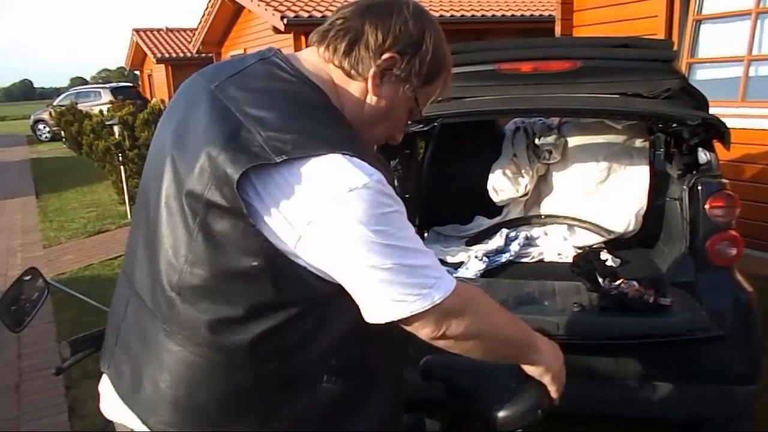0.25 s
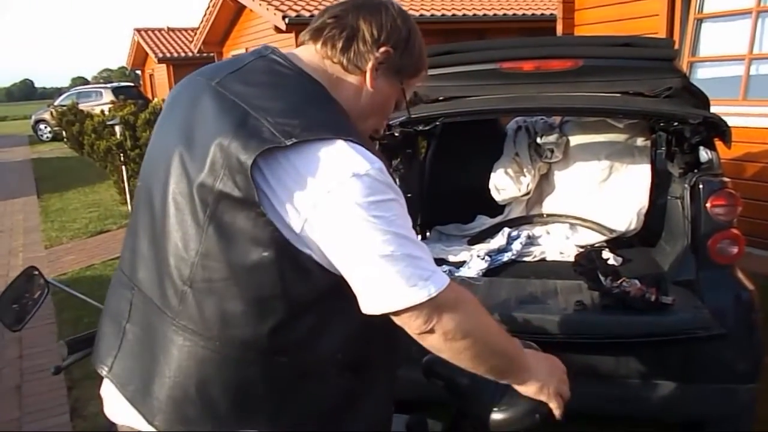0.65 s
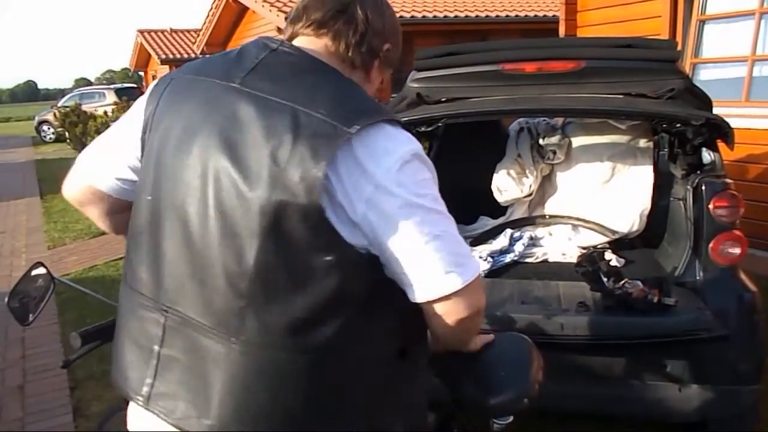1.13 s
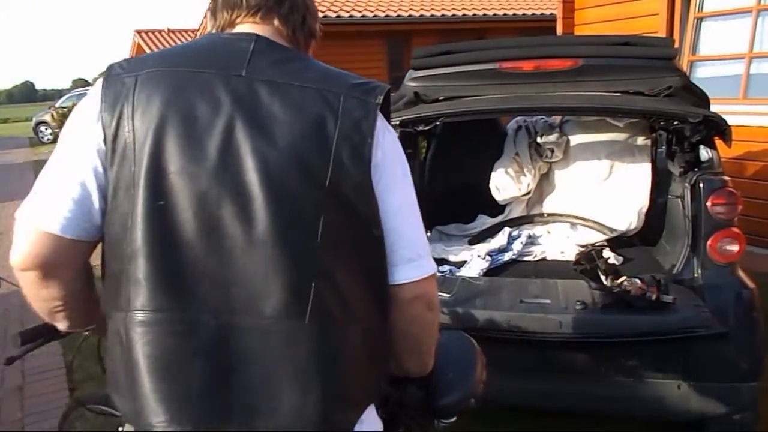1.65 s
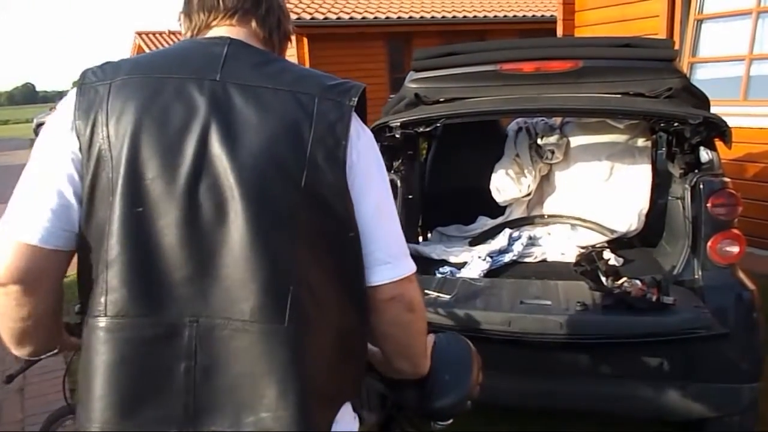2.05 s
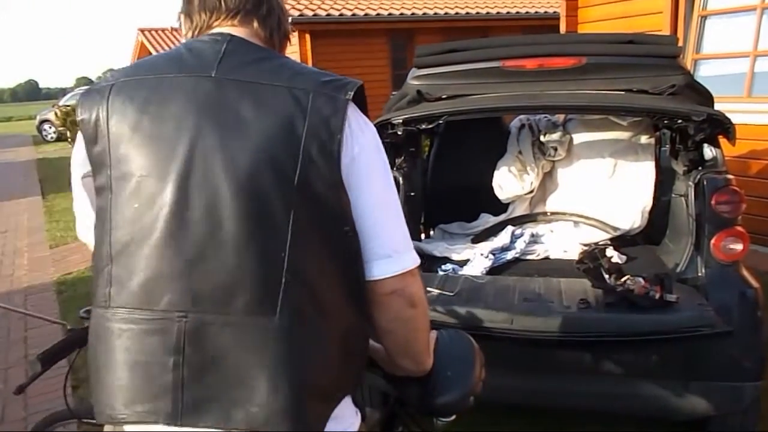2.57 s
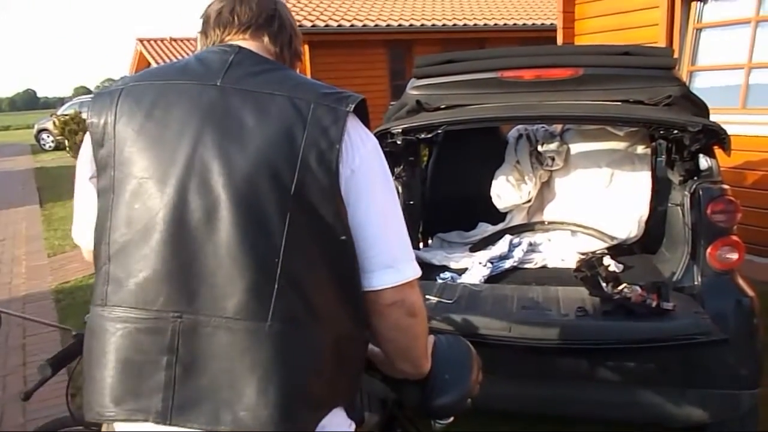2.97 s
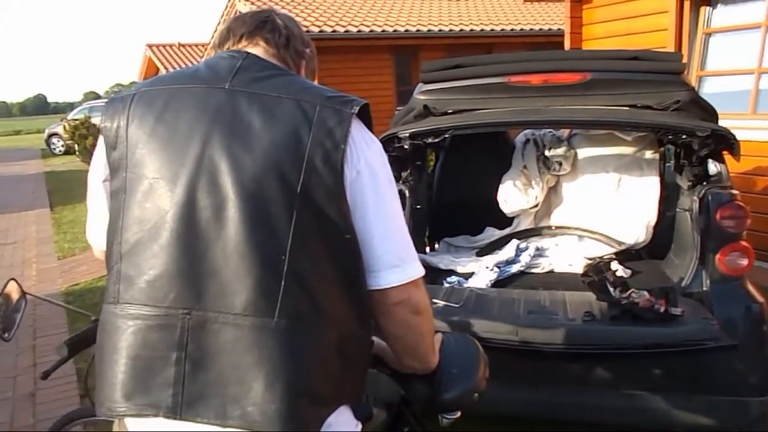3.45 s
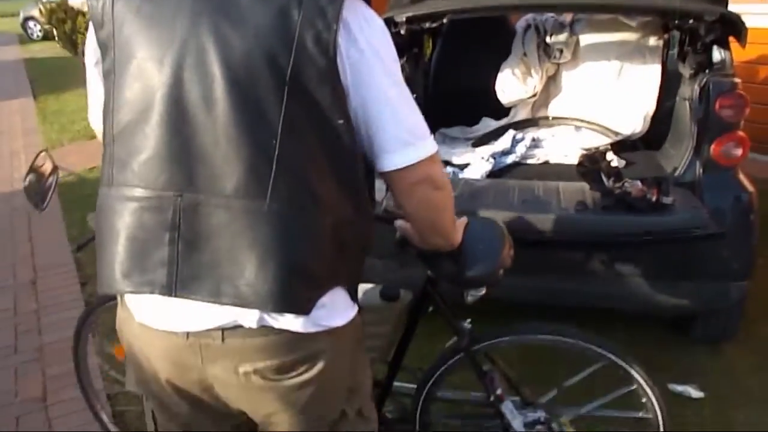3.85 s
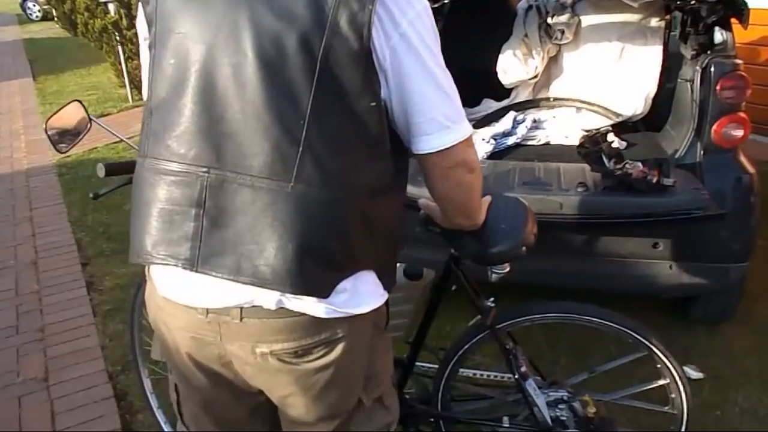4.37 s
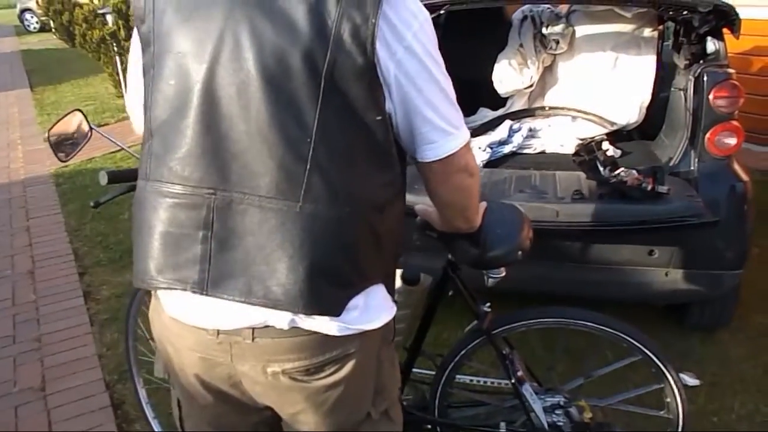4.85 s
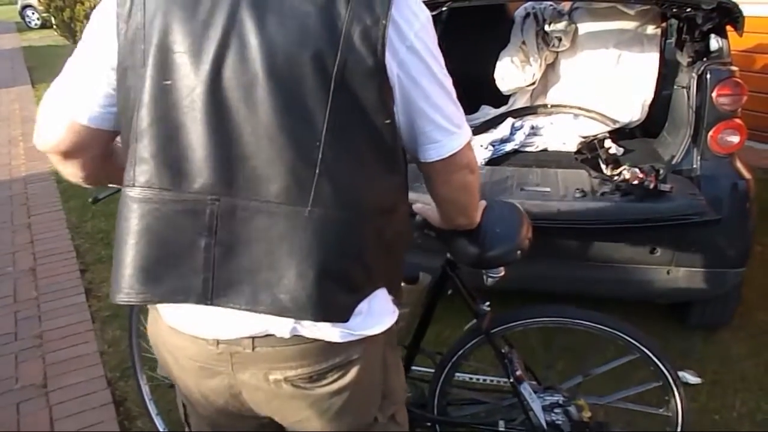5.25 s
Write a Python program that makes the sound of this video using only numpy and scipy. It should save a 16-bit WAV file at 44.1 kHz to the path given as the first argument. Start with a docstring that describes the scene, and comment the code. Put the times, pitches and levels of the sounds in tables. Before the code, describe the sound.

A small two-stroke bicycle motor putters unevenly, then idles with crackling pops until it is cut, coasts down and clanks to rest.

```python
"""A small two-stroke motor on a bicycle idles almost straight ahead of the microphone, in a driveway by a parked car.
It fires on every second turn, now and then on every third: each firing cracks, spits gas and booms in the pipe.
The ignition is cut with a snap of a lever, the crank coasts down, the drive rasps and clanks to rest.
Dull knocks fall at the start, around the cut and at the end, where the moved bicycle also creaks and rubs.
Behind it lie still outdoor air, a faint breeze on the microphone ports and short echoes of the driveway."""
import sys
import numpy as np
from scipy import signal
from scipy.fft import rfft, irfft
from scipy.io import wavfile

SR = 44100
rng = np.random.default_rng(int(sys.argv[2]) if len(sys.argv) > 2 else 0)


def file_out(sig):
    """Save sig as 16-bit WAV at sys.argv[1]."""
    # one column per channel
    cols = np.atleast_2d(sig).T
    # limit, then scale
    lim = np.clip(cols, -1, 1)
    pcm = np.round(lim * 32767).astype(np.int16)
    wavfile.write(sys.argv[1], SR, pcm)


N = 242980
TIME = np.arange(N) / SR


def from_db(db):
    """Decibels to gain."""
    return 10 ** (np.asarray(db) / 20)


def rms_one(x):
    """Scale to rms 1."""
    return x / np.sqrt(np.mean(x ** 2) + 1e-20)


def clicks(times, sizes, spread_db=0):
    """One click at each time, its size varied by chance."""
    out = np.zeros(N)
    at = np.round(np.asarray(times) * SR).astype(int)
    sizes = sizes * from_db(spread_db * rng.standard_normal(len(at)))
    inside = (at >= 0) & (at < N)
    np.add.at(out, at[inside], sizes[inside])
    return out + 1e-18


def grains(per_s):
    """Sparse clicks of random time, size and sign."""
    return (rng.random(N) < per_s / SR) * rng.standard_normal(N)


def resonate(x, hz, width):
    """A resonance of gain 1 at its top."""
    r = np.exp(-np.pi * width / SR)
    top = np.array([1, 0, -1]) * (1 - r * r) / 2
    return signal.lfilter(top, [1, -2 * r * np.cos(2 * np.pi * hz / SR), r * r], x)


def resonances(x, rows):
    """Resonances side by side; a fourth column, if any, is a signed factor."""
    return sum(np.prod(factor) * from_db(db) * resonate(x, hz, width) for hz, width, db, *factor in rows)


def struck(x, hz, width):
    """A unit click sets a sine of height 1 ringing."""
    r, w = np.exp(-np.pi * width / SR), 2 * np.pi * hz / SR
    return signal.lfilter([0, np.sin(w)], [1, -2 * r * np.cos(w), r * r], x)


def pops(times, sizes, hz, width, wander, spread_db, size=1024):
    """Each click rings a double resonance briefly, at a pitch and strength of its own."""
    out, unit = np.zeros(N + size), signal.unit_impulse(size)
    starts = np.round(times * SR).astype(int)
    sizes = sizes * np.ones(len(times))
    chances = rng.standard_normal((len(times), 2))
    for i, gain, (pitch, strength) in zip(starts, sizes, chances):
        centre = min(hz * np.exp(wander * pitch), .45 * SR)
        if 0 <= i < N:
            ring = resonate(resonate(unit, centre, width), centre, 1.07 * width)
            out[i:i + size] += gain * from_db(spread_db * strength) * ring
    return out[:N]


def blip(hz, rise_s, size=4096):
    """A short tone that swells for rise_s, to an envelope of 1, and dies away."""
    t = TIME[:size]
    return t / rise_s * np.exp(1 - t / rise_s) * np.sin(2 * np.pi * hz * t)


def fade(x, seconds):
    """Each click becomes a falling exponential of the same height."""
    return signal.lfilter([1], [1, -np.exp(-1 / (seconds * SR))], x)


def swells(rows):
    """Gain per sample of sounds that rise and fall smoothly."""
    return sum(from_db(db) * np.exp(-((TIME - s) / half) ** 2) for s, half, db in rows)


def waver(per_s):
    """A random curve of spread about 1 that takes a new value per_s times a second."""
    return np.interp(TIME * per_s, np.arange(2000), rng.standard_normal(2000))


def response(spectrum, size=2048):
    """The causal impulse response that has this spectrum, by folding the cepstrum."""
    hz, db = np.transpose(spectrum)
    grid = np.maximum(np.arange(size + 1) * SR / (2 * size), 1)
    cepstrum = irfft(np.log(from_db(np.interp(np.log(grid), np.log(hz), db))))
    cepstrum[1:size] *= 2
    cepstrum[size + 1:] = 0
    return irfft(np.exp(rfft(cepstrum)))


def through(x, impulse):
    """Pass a sound through an impulse response."""
    return signal.oaconvolve(x, impulse)[:N]


def noise(spectrum):
    """Coloured noise of rms 1."""
    return rms_one(through(rng.standard_normal(N), response(spectrum)))


def no_bass(x):
    """Small jets and small parts radiate no bass."""
    return signal.sosfilt(signal.butter(4, 520, "high", fs=SR, output="sos"), x)


# runs of even firing with a stumble between: first firing t/s, last firing t/s, firings, lag at mid-run/s
RUNS = [(-.005, .0383, 2, 0), (.1055, .1507, 2, 0), (.2202, .4842, 7, .0008), (.533, .7955, 7, .0014),
        (.864, 1.6937, 20, .0006), (1.7618, 2.0675, 8, .0005), (2.1353, 3.089, 23, .0039),
        (3.1335, 3.563, 11, -.001)]
# the ignition is cut after the last firing; oil drag and dry friction then slow the crank
CUT_S = RUNS[-1][1]
IDLE_TURNS_PER_S, DRAG_S, FRICTION_TURNS_PER_S2 = 45.21, 1.562, 31.03


def crank_speed():
    """Share of the idling speed: 1 until the cut, then falling to rest."""
    friction = FRICTION_TURNS_PER_S2 * DRAG_S / IDLE_TURNS_PER_S
    slowing = np.exp(-np.maximum(TIME - CUT_S, 0) / DRAG_S)
    return np.maximum((1 + friction) * slowing - friction, 0)


def crank():
    """Times of all turns and which fire: timed firings, idle turns between, then the coasting turns."""
    firings = []
    for first, last, count, lag in RUNS:
        u = np.linspace(0, 1, count)
        firings.extend(first + (last - first) * u + lag * np.sin(np.pi * u))
    # each gap starts with its firing and goes on with the idle turns
    idling = [np.linspace(a, b, round((b - a) * IDLE_TURNS_PER_S), endpoint=False)
              for a, b in zip(firings, firings[1:])]
    coasted = np.cumsum(crank_speed() * (TIME > CUT_S)) * IDLE_TURNS_PER_S / SR
    coasting_turns = TIME[np.searchsorted(coasted, np.arange(1, coasted[-1]))]
    turns = np.concatenate(idling + [firings[-1:], coasting_turns])
    return turns, np.isin(turns, firings)


def crank_angle(turns):
    """Angle of the crank in radians, one full circle from each turn to the next."""
    return 2 * np.pi * np.interp(TIME, turns, np.arange(len(turns)))


# still outdoor air: f/Hz, level/dB per Hz
AIR_SPECTRUM = [(20, -34), (60, -8), (110, -7.5), (190, -3.5), (262, 3), (380, -2), (550, -8),
                (1100, -12.5), (1900, -11.5), (2900, -16), (5000, -21.5), (7000, -35), (15000, -23)]
AIR_DB, WASH_DB, WASH_SPEED_POWER = -51.5, -40, 0.91


def air_level(speed):
    """Gain of the still outdoor air and of the soft wash of noise that the turning motor adds to it."""
    return np.hypot(from_db(AIR_DB), from_db(WASH_DB) * speed ** WASH_SPEED_POWER)


# faint breeze at the microphone: f/Hz, level/dB per Hz
BREEZE_SPECTRUM = [(25, 13), (70, 5.5), (150, -15), (300, -19), (1000, -59)]


def breeze(level_db=-78):
    """Air moving over the microphone ports is heard as a faint low noise."""
    return from_db(level_db) * noise(BREEZE_SPECTRUM)


def driveway(x, echo_db=-11, decay_s=0.033, low_hz=700, size=8192):
    """Scattered short echoes from the car, the paving and the house wall."""
    t = TIME[:size]
    echoes = rng.standard_normal(size) * (rng.random(size) < 1500 / SR) * (t > .003) * np.exp(-t / decay_s)
    bright = signal.sosfilt(signal.butter(2, low_hz, "high", fs=SR, output="sos"), x)
    return x + from_db(echo_db) * through(bright, echoes / np.sqrt(np.sum(echoes ** 2)))


# saddle creaks: middle t/s, half length to 1/e /s, level/dB
CREAKS = [(4.86, 0.05, -54), (5.04, 0.087, -56), (5.41, 0.29, -55.5)]
# tyre rubbing softly: middle t/s, half length to 1/e /s, level/dB
SCRAPES = [(4.41, 0.081, -55), (4.83, 0.079, -50.5), (4.99, 0.07, -58)]
# clothing: middle t/s, half length to 1/e /s, level/dB
RUSTLES = [(5.2, 0.37, -62), (5.47, 0.1, -52.5)]
# resonances of the rubbing: f/Hz, half the width of each of two passes/Hz, level/dB
RUB = [(1310, 130, -4), (1860, 180, -2), (2050, 86, -1)]
# colour of the saddle, also of parts settling after a knock: f/Hz, level/dB per Hz
SADDLE = [(150, -14), (500, -14), (1000, 6), (1400, 3), (2080, 4), (2330, -8), (2600, 2), (2900, -16),
          (6000, -31), (12000, -42)]
# colour of cloth: f/Hz, level/dB per Hz
CLOTH = [(150, -4), (500, -13), (1200, -5), (2000, -7), (3500, 0), (5500, -5.5), (8000, -7), (15000, -24)]


def handling(slips_per_s=900):
    """The saddle creaks under a hand and the tyre rubs, both by tiny slips; clothing rustles as noise."""
    slips = grains(slips_per_s)
    rubbing = sum(from_db(db) * resonate(resonate(slips, hz, 2 * width), hz, 2 * width)
                  for hz, width, db in RUB)
    creaking = swells(CREAKS) * rms_one(through(slips, response(SADDLE)))
    return creaking + swells(SCRAPES) * rms_one(rubbing) + swells(RUSTLES) * noise(CLOTH)


# low resonances of the frame: f/Hz, width/Hz, level/dB
FRAME = [(216, 77, 0), (279, 24, -0.5), (478, 49, -2), (530, 44, -17)]
# frame rumbles: middle t/s, half length to 1/e /s, level/dB
RUMBLES = [(.205, 0.017, -25.5), (3.53, 0.018, -30), (3.615, 0.023, -29), (3.85, 0.15, -41.5),
           (4.12, 0.14, -39.5), (4.42, 0.04, -46), (5.02, 0.033, -49.5)]


def rumble():
    """The frame's low resonances, driven by noise, rumble as the bicycle is jostled."""
    return swells(RUMBLES) * rms_one(resonances(rng.standard_normal(N), FRAME))


# dull knocks: t/s, thud level/dB, hollow f/Hz, clack level/dB, clack f/Hz
KNOCKS = [(.098, -12.5, 198, -19, 1390), (0.1, -34, 245, -21, 1330), (.189, -24, 227, -42, 1400),
          (.198, -21, 226, -15, 1960), (3.564, -23, 242, -26, 2450), (3.575, -31, 237, -17, 1890),
          (3.639, -32, 240, -19.5, 2060), (4.862, -27, 193, -40, 1850), (4.881, -23.5, 239, -25, 1990),
          (4.891, -32, 240, -28.5, 1380), (4.905, -33, 248, -35, 1480), (4.937, -22, 234, -37, 1880),
          (4.986, -42, 250, -44, 1950), (5.027, -37, 255, -43, 1400), (5.262, -40, 253, -36.5, 1910),
          (5.269, -43, 255, -42, 2410), (5.289, -47, 260, -50, 1700)]
# colour of a thud: f/Hz, level/dB per Hz
THUD = [(40, -29), (80, -4), (130, -0.5), (230, 16.5), (350, 5), (700, -3.5), (1600, -0.5), (3000, -56),
        (9000, -60)]


def knocks(clack_rise_s=0.0011, hollow_rise_s=0.0045, hollow_db=-9, tube_hz=590, tube_width=140, tube_db=4,
           crackle_s=0.0088, crackle_db=-17, crackles_per_s=900):
    """Soft knocks: a hollow thud and a clack at the pitch of the spot struck, then parts crackle and settle."""
    thud = response(THUD)
    s, thud_level = np.transpose(KNOCKS)[:2]
    blows = clicks(s, from_db(thud_level))
    thuds = through(blows, thud / np.abs(thud).max())
    out = thuds + from_db(tube_db) * resonate(thuds, tube_hz, tube_width)
    settling = rms_one(through(grains(crackles_per_s), response(SADDLE)))
    out += from_db(crackle_db) * fade(blows, crackle_s) * settling
    for start, thud_db, hollow_hz, clack_db, clack_hz in KNOCKS:
        hollow = from_db(thud_db + hollow_db) * blip(hollow_hz, hollow_rise_s)
        tones = hollow + from_db(clack_db) * blip(clack_hz, clack_rise_s)
        i = round(start * SR)
        out[i:i + len(tones)] += tones
    return out


# the lever's snap: f/Hz, width/Hz, level/dB
LEVER = [(620, 500, 14.5), (1860, 760, 22.5), (2480, 690, 18)]


def lever(snap_s=3.5651, count=4, bounce_s=.0017, loss_db=2.7):
    """A lever snaps over as the ignition is cut: it hits its stop and bounces, weaker each time."""
    k = np.arange(count)
    at = snap_s + bounce_s * k
    return sum(pops(at, from_db(db - loss_db * k), hz, width, wander=0.093, spread_db=0.0)
               for hz, width, db in LEVER)


# vibration locked to the crank: multiple of the turning rate, level/dB
SHAKE = [(3, -21), (4, -2.5), (5, -10), (6, -4.5), (7, -2.5), (8, -10), (13, -18), (14, -13)]


def coasting(turns, speed, shake_db=-27.0, onset_s=0.066, shake_speed_power=3.8, rough=0.26, rough_per_s=25):
    """Running down, the crank shakes the bicycle with a rough, falling hum."""
    shake = from_db(shake_db) * np.clip((TIME - CUT_S) / onset_s, 0, 1) * speed ** shake_speed_power
    angle = crank_angle(turns)
    hum = 0
    for multiple, db in SHAKE:
        height = from_db(db) * (1 + rough * waver(rough_per_s))
        phase = rough * waver(rough_per_s) + rng.uniform(0, 2 * np.pi)
        hum = hum + height * np.sin(round(multiple) * angle + phase)
    return shake * hum * (TIME < turns[-1])


def backlash(speed, ticks_per_s=260, tick_hz=2300, tick_width=520, wander=0.453, tick_db=2,
             tick_speed_power=1.4):
    """With no load the gears clatter loosely to and fro as the crank coasts, each tick at its own pitch."""
    hit = (rng.random(N) < ticks_per_s / SR) & (TIME > CUT_S) & (speed > 0)
    sizes = from_db(tick_db) * speed[hit] ** tick_speed_power
    return pops(TIME[hit], sizes, tick_hz, tick_width, wander, spread_db=2.0)


# slack of the drive clanking on the last slow turns: t/s, contact level/dB, ring level/dB
CLANKS = [(3.974, -25, -34), (4.017, -19, -31), (4.13, -14.5, -34), (4.183, -22, -34), (4.194, -20.5, -35),
          (4.266, -22.5, -35.5), (4.287, -25, -30.5), (4.322, -36, -38), (4.374, -27, -26.5),
          (4.398, -28, -55), (4.529, -24, -28), (4.63, -37.5, -43), (4.715, -52, -53)]
# the drive slipping: t/s, length/s, grinding level/dB, skipping teeth level/dB
RASPS = [(4.06, 0.029, -17.5, -27), (4.447, 0.019, -43.5, -47)]
RASP_ATTACK_S, RASP_RELEASE_S, TOOTH_S = 0.002, 0.01, 0.0073
# sprocket and frame ringing on: f/Hz, level/dB, time to fall 60 dB/s
SPROCKET = [(490, -24, 0.36), (1160, 4.5, 0.0053), (2100, -30, 0.11), (2470, -10, 0.073),
            (2744, -6.5, 0.062), (2870, -3, 0.026), (3542, -23, 0.22), (3639, -10.5, 0.24),
            (3780, -1, 0.051), (4177, -20, 0.14), (4360, -7.5, 0.028), (4860, -18, 0.06), (5500, -40, 0.3)]
# the frame's short answer to a clank: f/Hz, width of each of two passes/Hz, level/dB
KNOCKING = [(237, 61, 31), (1010, 330, 23.5)]
# colour of metal contact, here and under the loose cover: f/Hz, level/dB per Hz
METAL = [(150, -7), (400, -4), (1200, -1), (1900, 4.5), (2700, 5), (3700, 10), (5300, 2), (7000, -3),
         (11000, -7.5), (16000, -24)]


def drive(contact_s=0.006, contact_db=-6.5, skip_ring_db=-12, grains_per_s=6000):
    """The drive rasps from tooth to tooth and its slack clanks: the frame knocks, the sprocket rings on."""
    skips = [(start + delay, db, db + skip_ring_db)
             for start, length, _, db in RASPS for delay in np.arange(0, length, TOOTH_S)]
    s, db, rung_db = np.transpose(list(CLANKS) + skips)
    out = from_db(contact_db) * fade(clicks(s, from_db(db)), contact_s) * noise(METAL)
    out += sum(pops(s, from_db(db + level_db), hz, width, wander=0.13, spread_db=1.5, size=4096)
               for hz, width, level_db in KNOCKING)
    for k, (hz, level_db, t60) in enumerate(SPROCKET):
        hits = clicks(s, from_db(rung_db + level_db), spread_db=2.5)
        out += (-1) ** k * struck(hits, hz, np.log(1000) / (np.pi * t60))
    grinding = 0
    for start, length, level_db, _ in RASPS:
        attack = np.clip((TIME - start) / RASP_ATTACK_S, 0, 1)
        release = np.exp(-np.maximum(TIME - start - length, 0) / RASP_RELEASE_S)
        grinding = grinding + from_db(level_db) * attack * release
    return out + grinding * rms_one(through(grains(grains_per_s), response(METAL)))


# how hard the loose cover chatters: t/s, level/dB
CHATTER = [(0, -38), (.7, -26.5), (1.3, -29.5), (2.1, -27.5), (2.6, -21.5), (3.5, -22), (3.9, -37),
           (4.1, -60)]
# the cover's pings: f/Hz, width/Hz, level/dB
COVER = [(2837, 21.4, -6), (2940, 50, -5.5), (3130, 100, -25), (3978, 37, -10)]


def cover(turns, chance=.55, delay_s=0.0071, scatter_s=.003, tick_s=0.00065, tick_db=-7):
    """On some turns the loose cover is thrown against the casing, a little after the port opens, and pings."""
    at = turns + delay_s + scatter_s * rng.standard_normal(len(turns))
    force = from_db(np.interp(at, *np.transpose(CHATTER)))
    hits = clicks(at, force * (rng.random(len(at)) < chance), spread_db=2.0)
    tick = from_db(tick_db) * fade(hits, tick_s) * noise(METAL)
    return tick + sum(from_db(db) * struck(hits, hz, width) for hz, width, db in COVER)


def rattle(turns, fired, count=3, first_s=0.00302, last_s=.013, hz=3500, width=600, wander=0.304,
           rattle_db=4, rise_db_per_s=2.0):
    """Just after each firing the loose tinware chatters a few times, never twice alike."""
    at = np.repeat(turns[fired], count)
    at = at + first_s + (last_s - first_s) * rng.random(len(at))
    return pops(at, from_db(rattle_db + rise_db_per_s * at), hz, width, wander, spread_db=2.0)


# colour of the repeating clatter: f/Hz, level/dB per Hz
BUZZ = [(100, -16.5), (300, 2), (450, 2), (650, -4), (780, -13.5), (950, 1.5), (1400, -3.5), (1900, -8.5),
        (2500, -2), (5000, -14.5), (9000, -39)]


def buzz(turns, fired, buzz_db=-39, decay_s=0.013, size=2048):
    """Every firing sets the gears and bearings clattering in the same pattern, so the clatter repeats as a
    pitched buzz."""
    answer = rng.standard_normal(size) * np.exp(-TIME[:size] / decay_s)
    shaken = through(clicks(turns[fired], 1), answer)
    return from_db(buzz_db) * rms_one(through(shaken, response(BUZZ)))


def imbalance(turns, speed, hum_db=-45.0, rise_db_per_s=2.06, hum_speed_power=4.2):
    """The piston's to and fro shakes the frame with a clean hum at twice the turning rate."""
    level = from_db(hum_db + rise_db_per_s * np.minimum(TIME, CUT_S)) * speed ** hum_speed_power
    return level * np.sin(2 * crank_angle(turns))


# cylinder fins and covers: f/Hz, width/Hz, level/dB
CASING = [(984, 18.5, 6), (1130, 40, 2), (1416, 62, -4), (1780, 74, 3), (2170, 57, -3), (2460, 140, 3.5),
          (2890, 100, 9.5), (3590, 26, -7), (3780, 93, 1.5), (4554, 36, 5.5)]
# colour of the gears, also of the port's wheeze: f/Hz, level/dB per Hz
CLATTER = [(400, 10), (750, -4), (1250, 4.5), (2000, -5.5), (2900, -12), (4000, -0.5), (5500, -20),
           (8000, -11.5), (15000, -31)]


def clatter(turns, speed, slap_delay_s=0.0047, slap_s=0.00081, slap_db=6, rock_lead_s=0.0041, rock_db=2,
            ring_db=-35.5, ring_rise_db_per_s=0.26, ring_speed_power=1.84,
            churn_db=-36, churn_fall_db_per_s=1.36, churn_speed_power=0.93, teeth_per_s=1500):
    """Gears rattle, harder as the piston slaps before and after each port opening; all fades with speed."""
    slaps = fade(clicks(turns + slap_delay_s, from_db(slap_db), spread_db=0.5), slap_s)
    slaps += fade(clicks(turns - rock_lead_s, from_db(rock_db), spread_db=2.5), slap_s)
    teeth = grains(teeth_per_s) * (1 + slaps)
    ring = resonances(teeth, CASING)
    churn = no_bass(through(teeth, response(CLATTER)))
    # the casing rings more as it warms
    casing = from_db(ring_db + ring_rise_db_per_s * TIME) * speed ** ring_speed_power
    gears = from_db(churn_db - churn_fall_db_per_s * TIME) * speed ** churn_speed_power
    return casing * rms_one(ring) + gears * rms_one(churn)


# air-box and crankcase, pumped on every turn: f/Hz, width/Hz, level/dB, signed factor
AIRBOX = [(151, 9.5, 10, 0.055), (174.3, 13.7, 24.5, 0.85), (220, 61, 11.5, 0.96), (283, 29.7, 21, -0.77),
          (389, 50, 8, 0.89)]


def pumping(turns, fired, speed, lead_s=0.00279, gulp_db=2.5, idle_db=-1.5, coast_db=-5, gulp_speed_power=0.83,
            puff_hz=1280, puff_width=380, puff_db=8, unlit_db=7.5, clearing_s=0.073, puff_speed_power=0.83,
            wheeze_db=-37, wheeze_s=0.019):
    """The piston gulps air on every turn and puffs on unfired ones; after the cut the puffs stand out."""
    gulp_level = from_db(gulp_db + idle_db * ~fired + coast_db * (turns > CUT_S))
    gulps = clicks(turns - lead_s, gulp_level, spread_db=1.0) * speed ** gulp_speed_power
    airbox = resonances(gulps, AIRBOX)
    at = turns[~fired]
    puffs = from_db(unlit_db * np.clip((at - CUT_S) / clearing_s, 0, 1))
    puffs = puffs * np.interp(at, TIME, speed) ** puff_speed_power
    port = pops(at, from_db(puff_db) * puffs, puff_hz, puff_width, wander=0.063, spread_db=2.0)
    wheeze = from_db(wheeze_db) * fade(clicks(at, puffs, spread_db=2.0), wheeze_s) * noise(CLATTER)
    return airbox + port + no_bass(wheeze)


# how fully the charges burn, used relative to the mean before the cut: t/s, level/dB
BURN = [(0.03, -35), (.5, -34), (0.72, -30), (1.12, -34.5), (1.19, -30.5), (2.96, -29.5), (3.05, -30),
        (3.54, -30.5)]
# firings that crack harder or softer than the rest: t/s, level/dB
ODD_FIRINGS = [(.151, 2), (.264, 2), (.352, 0), (.484, -1.5), (.533, -2.5), (.864, 2.5), (1.213, 2),
               (1.256, -0.5), (1.3, 1.5), (1.343, 0.5), (1.606, 3), (2.024, 2.5), (3.176, 4), (3.563, -1)]
# dB of boom, crack and gas hiss for each dB of burn
BOOM_FOLLOWS, CRACK_FOLLOWS, HISS_FOLLOWS = 1.5, -0.022, 0.9
# the crack softens as the motor warms
COLD_CRACK_DB, SOFTENING_DB_PER_S = 2, 1.23


def combustion(boom_db=-2.0, hiss_db=2.0, reach_s=.02):
    """Gains of crack, boom and hiss: a full burn booms and hisses more, a cold motor cracks harder."""
    burn = np.interp(TIME, *np.transpose(BURN))
    burn = burn - burn[TIME < CUT_S].mean()
    odd = sum(db * (np.abs(TIME - s) < reach_s) for s, db in ODD_FIRINGS)
    crack_db = COLD_CRACK_DB - SOFTENING_DB_PER_S * TIME + CRACK_FOLLOWS * burn + odd
    return from_db([crack_db, boom_db + BOOM_FOLLOWS * burn, hiss_db + HISS_FOLLOWS * burn])


# exhaust pipe, blown by the firings: f/Hz, width/Hz, level/dB, signed factor
PIPE = [(67.5, 3.8, 15, 0.9), (163.4, 5.6, 26, 0.88), (200, 64, 36.5, 0.1829), (246.1, 10.9, 27.5, -1.35),
        (298.8, 13.6, 18, -2), (334, 15, 17, -0.8), (486.6, 9.7, 28.5, -0.25), (624, 45, 11.5, 0.3),
        (988, 29, 14, -1)]
# muffler chamber, passed twice: f/Hz, width of each pass/Hz, level/dB
MUFFLER = (521.5, 52.7, 32.1)
# the bang at the outlet: f/Hz, width of each of two passes/Hz, level/dB, signed factor
BANG = [(1172, 382, 19.5, -1.17), (1676, 160, 12, -0.54), (2470, 210, 13, 0.9), (3496, 420, 16.5, -1.12),
        (3720, 210, 14, 0.73), (4280, 590, 4.5, -1.44), (5070, 370, 13, 0.78), (11250, 2600, 12.5, -0.32)]
# colour of the spat gas: f/Hz, level/dB per Hz
GAS = [(400, 10.5), (750, -38), (1200, 5), (2000, -4), (2600, 5), (3500, -1.5), (5200, 1.5), (6500, -1.5),
       (11000, -3.5), (16000, -29)]


def exhaust(turns, fired, lead_s=0.001004, late_s=.0009, scatter_cycles=0.11, spit_s=0.0025, swell_s=0.00087,
            hiss_s=0.012, spit_db=-17, hiss_db=-25.0):
    """Each firing cracks at the outlet, spits gas, and booms in the pipe and muffler."""
    crack, boom, hiss = combustion()
    at = turns[fired]
    blows = clicks(at, 0.82, spread_db=0.5)
    pipe = resonances(blows, PIPE)
    hz, width, db = MUFFLER
    # two chambers in a row: the boom swells for some milliseconds before it dies
    muffler = -from_db(db) * resonate(resonate(blows * boom, hz, width), hz, width)
    bang = 0
    for hz, width, db, factor in BANG:
        # the low part repeats closely; the high part comes later and differs more between firings
        chance = np.sqrt(min(hz / 3500, 1))
        scatter = chance ** 2 * scatter_cycles / hz * rng.standard_normal(len(at))
        fronts = at - lead_s + late_s * np.log10(hz / BANG[0][0]) + scatter
        sizes = from_db(db) * np.interp(at, TIME, crack) ** chance
        bang = bang + factor * pops(fronts, sizes, hz, width, wander=0.038, spread_db=2.56 * chance ** 2)
    spit = from_db(spit_db) * fade(clicks(at - lead_s - swell_s, 1.0, spread_db=4.0) * crack, spit_s)
    jet = spit + from_db(hiss_db) * fade(blows * hiss, hiss_s)
    # the port takes a moment to open
    jet = fade(jet, swell_s) / (swell_s * SR)
    return pipe + muffler + bang + no_bass(jet * noise(GAS))


def scene(side_db=-24, stray_db=-26, stray_hz=5000, air_side_db=-30, lean_db=-31, lean_hz=1500):
    """The bicycle stands almost straight ahead; side echoes, a slight treble lean and the air give width."""
    turns, fired = crank()
    speed = crank_speed()
    air = air_level(speed)
    motor = exhaust(turns, fired) + pumping(turns, fired, speed) + imbalance(turns, speed)
    motor += clatter(turns, speed) + cover(turns) + buzz(turns, fired) + rattle(turns, fired)
    bicycle = motor + coasting(turns, speed) + rumble() + drive() + knocks() + lever() + backlash(speed)
    mid = driveway(bicycle) + air * noise(AIR_SPECTRUM) + handling()
    side = from_db(side_db) * (driveway(mid, echo_db=-38.0, decay_s=0.0027, low_hz=1260) - mid)
    # the two ports hear the shortest waves least alike
    stray = driveway(mid, echo_db=5.5, decay_s=0.0016, low_hz=stray_hz) - mid
    side += through(stray, response([(5000, stray_db), (11000, -23.5)]))
    # the treble leans a little to the right
    side -= from_db(lean_db) * signal.lfilter(*signal.butter(1, lean_hz, "high", fs=SR), mid)
    side += from_db(air_side_db) * air * rms_one(no_bass(noise(AIR_SPECTRUM)))
    side += breeze()
    return np.array([mid + side, mid - side])


# microphone port: f/Hz, level/dB
MICROPHONE = [(20, -9), (55, 1), (5600, 0.5), (6300, -4), (7000, -23.5), (7700, -13.5), (8500, -29.5),
              (9200, -13), (10000, -24.5), (11000, -6), (12100, -23.5), (12700, -14.5), (13700, -24),
              (15700, -12)]
CUTOFF_HZ = 16200


def record(dry, top=0.96):
    """A small microphone with a ragged, dull treble; peaks are rounded and the top is cut."""
    coloured = np.array([through(channel, response(MICROPHONE)) for channel in dry])
    rounded = top * np.tanh(coloured / top)
    return signal.sosfilt(signal.ellip(10, .1, 80, CUTOFF_HZ, fs=SR, output="sos"), rounded)


dry = scene()
out = record(dry)
file_out(out)
```